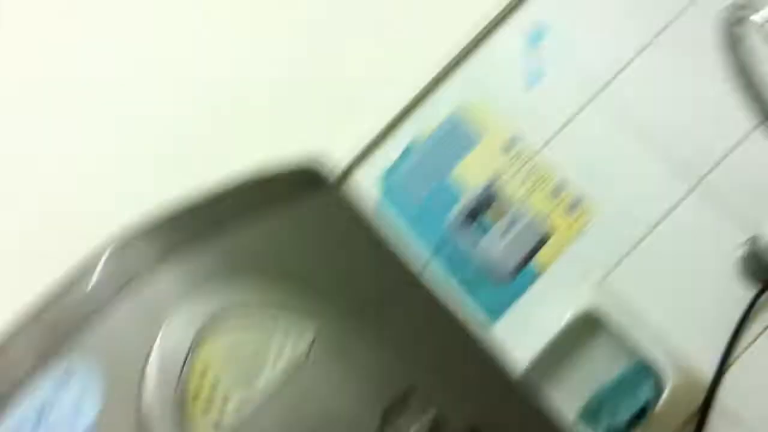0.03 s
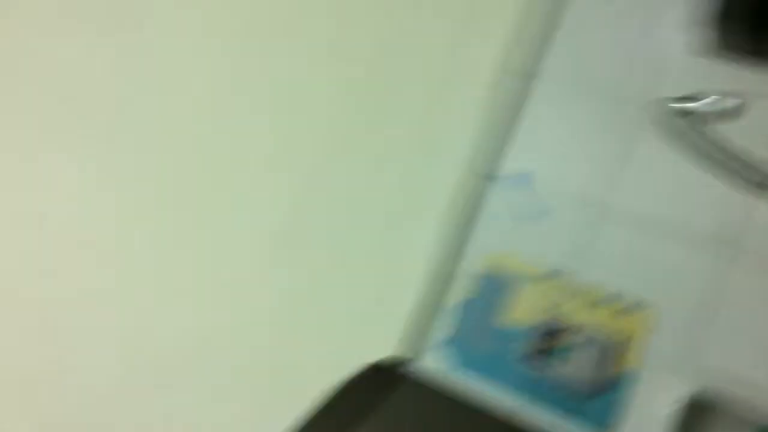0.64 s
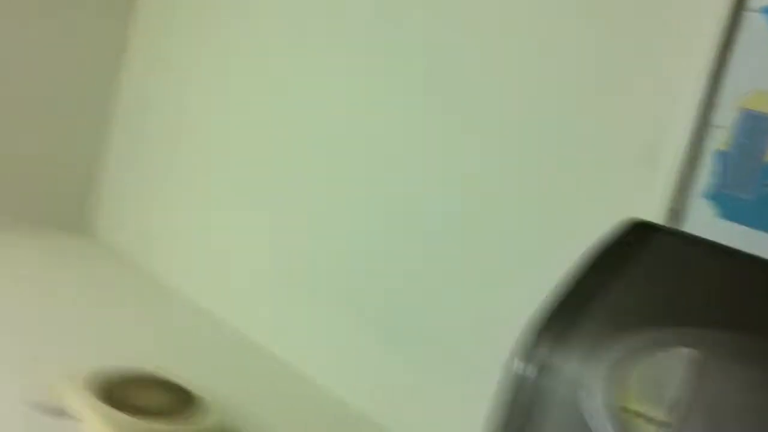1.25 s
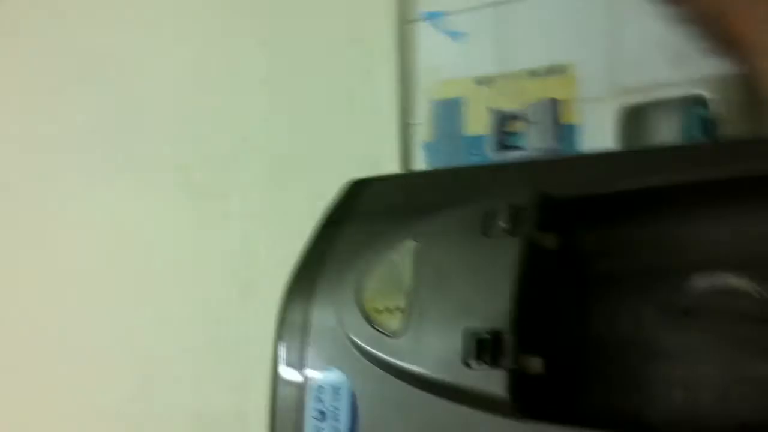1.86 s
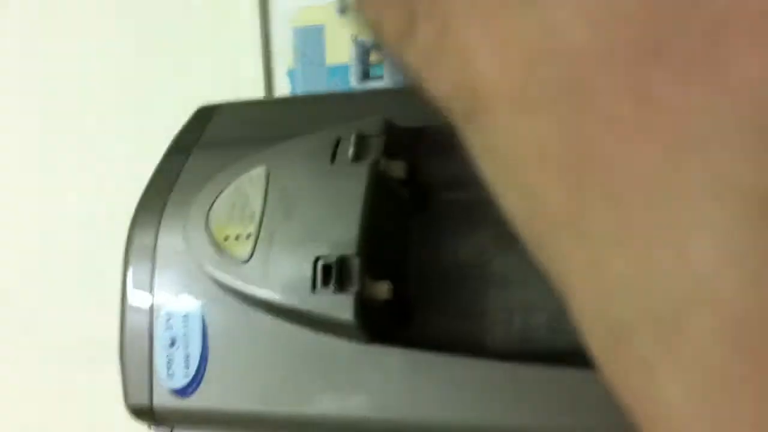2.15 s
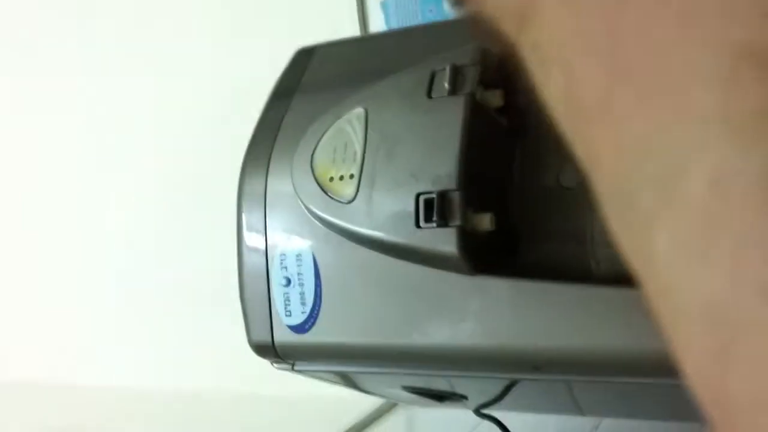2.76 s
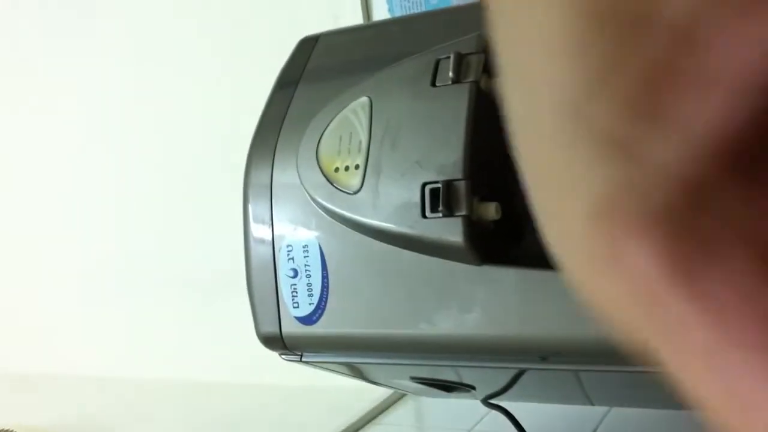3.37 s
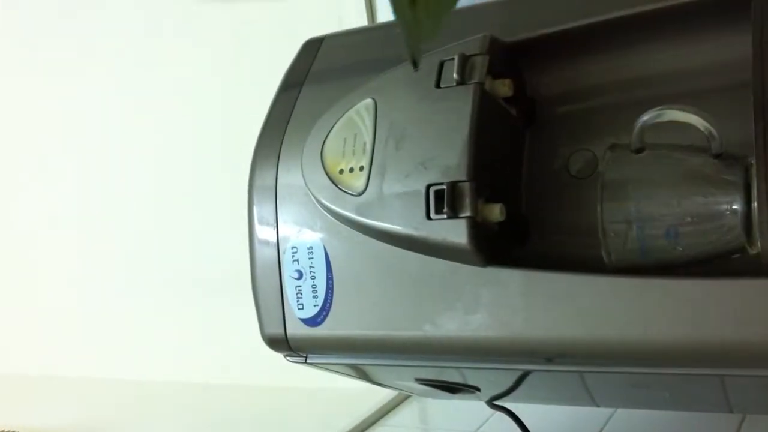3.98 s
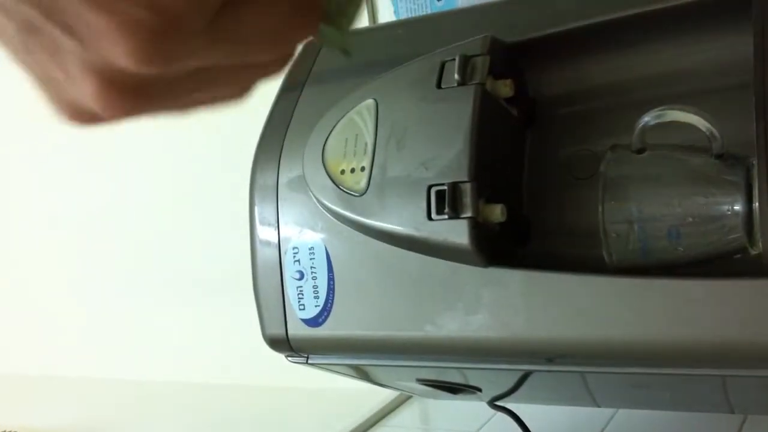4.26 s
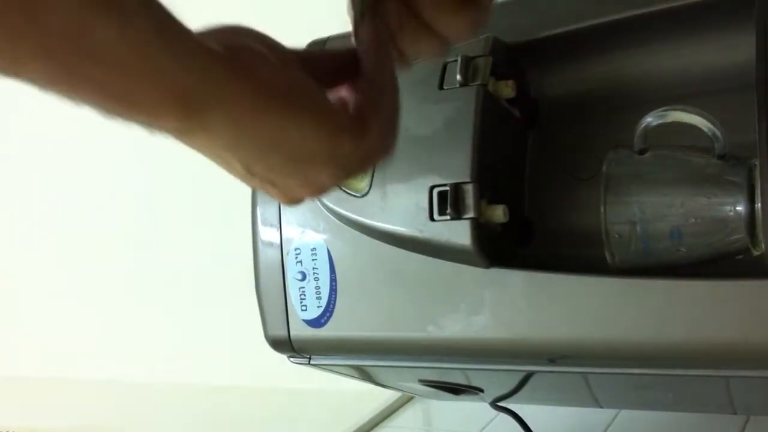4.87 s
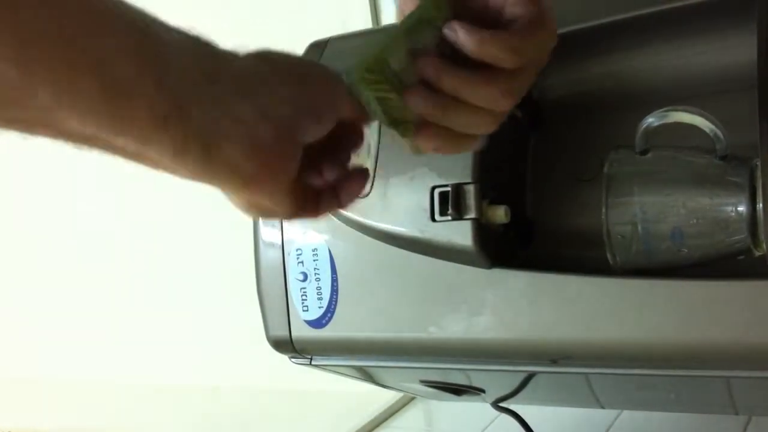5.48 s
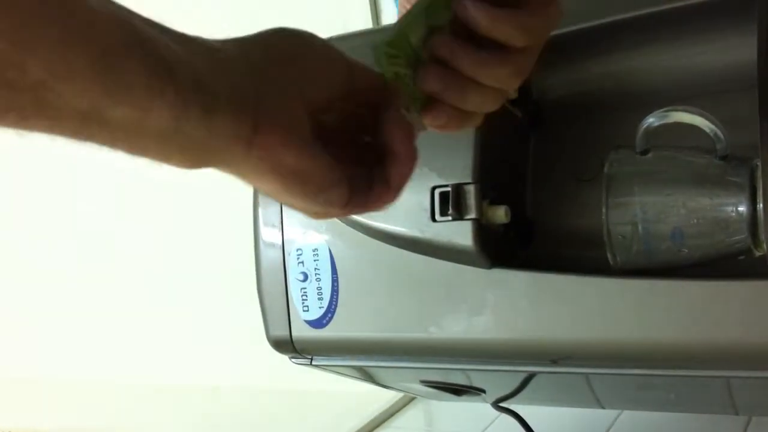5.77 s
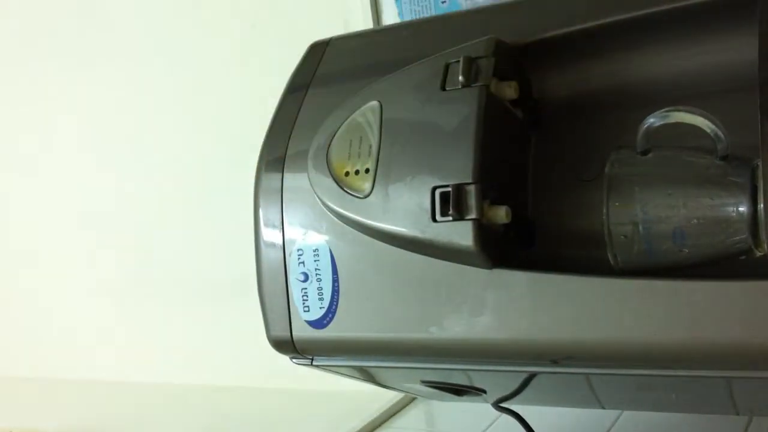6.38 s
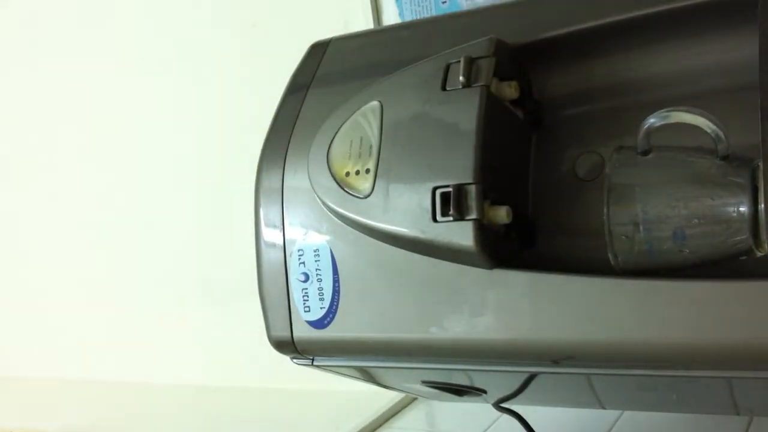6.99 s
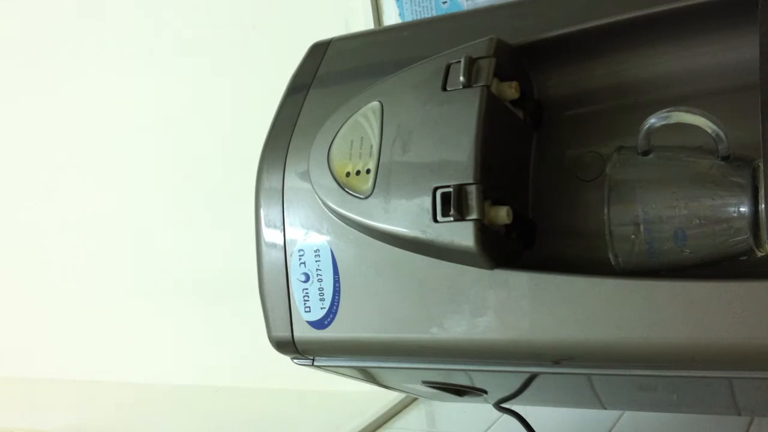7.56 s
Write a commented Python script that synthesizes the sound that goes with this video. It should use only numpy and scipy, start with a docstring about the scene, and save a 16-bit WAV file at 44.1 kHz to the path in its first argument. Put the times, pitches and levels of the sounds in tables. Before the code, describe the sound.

Over a faint kitchen hum, a packet rubs and snaps, a glass mug knocks down twice, and the packet tears in three pulls.

```python
"""Over a faint machine hum in a small tiled kitchen, a packet slides out with a hollow rub, snapping
as it buckles. A glass mug lands on a water dispenser's plastic tray and rocks; tray and glass ring.
Fingers crinkle the packet and rip it in three pulls, fibre by breaking fibre, and a dull bump follows.
An automatic gain control ducks the whole mix after the loudest hits and creeps back."""
import sys
import numpy as np
from scipy import signal
from scipy.fft import rfft, irfft, next_fast_len
from scipy.io import wavfile
from scipy.ndimage import uniform_filter1d

SR = 44100
rng = np.random.default_rng(int(sys.argv[2]) if len(sys.argv) > 2 else 0)


def pcm_store(signal):
    """Save signal as 16-bit PCM."""
    levels = np.round(np.clip(np.atleast_2d(signal), -1, 1) * 32767)
    wavfile.write(sys.argv[1], SR, levels.astype(np.int16).T)


N = 340893

# The bed of hum and hiss. Each row: frequency in Hz, relative level in dB.
HUM_EQ = [(25, -24), (70, -22), (110, -3), (170, 2), (240, -2), (370, -2), (550, -9.5), (750, -11.5),
          (1150, -9.5), (2000, -18), (4500, -18), (7000, -20), (12000, -22.5), (16000, -19.5)]
# The machine's fuzzy whines. Each row: centre in Hz, width in Hz, level in dB.
WHINES = [(181.1, 46, -74.5), (363.9, 18, -71), (484.5, 4.8, -74.5), (3777, 93, -77), (4600, 64, -80),
          (5170, 60, -82.5), (5955, 92, -79.5), (14720, 500, -75.5)]
# The tiled room's reverb. Each row: frequency in Hz, time to fall 60 dB in seconds.
ROOM_DECAY = [(200, 0.87), (600, .42), (1400, 0.44), (3700, .52), (9700, .4), (16000, 0.42)]
# Strokes that slide the packet out. Each row: fastest moment, rise and fall in seconds,
# then relative rub and swish levels in dB.
SLIDE_STROKES = [(.6, 0.09, 0.4, -59.5, -59), (0.859, 0.078, .14, -51, -49), (1.16, .11, 0.15, -57, -63.5),
                 (1.48, 0.16, .03, -52, -54)]
# The hollow surface under the rub. Each row: centre in Hz, width in Hz, boost in dB.
SURFACE_RESONANCES = [(1603, 200, 3), (1957, 150, 3), (2355, 160, 4), (3050, 150, 4.5)]
# The midrange body of the slide. Each row: frequency in Hz, relative level in dB.
RUB_EQ = [(250, -36), (450, -5.5), (700, -8.5), (950, -7.5), (1300, -2.5), (1600, -1.5), (2350, -2.5),
          (2900, -10), (5000, -16.5), (7000, -24)]
# The airy top of the slide. Each row: frequency in Hz, relative level in dB.
SWISH_EQ = [(1500, -23), (2500, -7), (2950, 1), (3600, -3), (6500, -2.5), (10000, -7.5), (16000, -12.5)]
# The packet buckles. Each row: start in seconds, relative level in dB, ring pitch in Hz,
# treble tilt in dB per octave, relative reverb send in dB.
BUCKLES = [(.495, -37.5, 4160, -1, -7), (.518, -15, 1800, 1.5, -7), (.646, -35, 6300, -0.5, -2),
           (1.283, -29.5, 2400, -4, -18), (1.439, -34, 1903, 0, -7), (1.468, -33.5, 1903, 0, -8),
           (1.503, -26.5, 1156, -4, -3.5), (1.5062, -13, 1800, .5, -12.5), (1.983, -14.5, 5830, -2, -13),
           (3.527, -25, 2400, -2.5, -8.5), (3.572, -36.5, 4600, -4, -7), (3.608, -27, 2600, -4, -6),
           (3.6752, -21, 3440, -1, -7.5), (3.941, -33.5, 2180, -3.5, -2), (4.057, -28.5, 7260, -2, -3),
           (4.701, -29, 8680, 2.5, -.5), (4.852, -33, 5540, -2, 0), (5.0624, -33, 10700, 2.5, -19),
           (5.086, -9, 9230, 4, -5), (5.175, -30.5, 6000, 2, -7), (5.389, -38, 3580, -4, -10),
           (5.527, -23.5, 11000, 2.5, 0), (5.608, -24, 9000, 0, -11.5), (5.782, -31, 2220, -1.5, -3),
           (5.8633, -23, 4500, -1, -3), (6.027, -20, 11100, -1, -1), (6.288, -30, 2400, -1, 0),
           (6.396, -28.5, 4420, -3, -1)]
# The basic tone of a snap. Each row: frequency in Hz, relative level in dB.
SNAP_EQ = [(60, -23), (250, -8), (430, -4.5), (800, -1), (2000, -2.5), (6000, 0.5), (11000, -3.5),
           (16000, -8.5)]
# The mug meets the tray. Each row: start in seconds, relative level in dB, first rocking gap in seconds,
# loss per contact in dB, contact cutoff in Hz (lower is softer), tray note in Hz,
# then the ring of the mug's wall and of its base in relative dB.
MUG_KNOCKS = [(1.92, -47, .002, 4.5, 1200, 701, -12, -21), (2.039, -37.5, 0.0046, 15, 686, 385, -21, -25),
              (2.0808, -4, 0.0027, 3.5, 3200, 852, 5.5, 1.5), (2.232, -33, .0019, 4, 805, 667, -11, -22.5),
              (2.293, -44.5, 0.0021, 2, 1200, 950, -5, -21), (2.4173, -28, 0.0034, 1.3, 1200, 553, -20, 22),
              (2.742, -42, .002, 9, 1500, 400, -24, -22.5), (2.7788, -8.5, 0.0029, 2.5, 2795, 927, -12, 22),
              (2.91, -44.5, 0.0031, 7, 400, 230, -18, -21)]
# The clack of glass on plastic. Each row: frequency in Hz, relative level in dB.
CONTACT_EQ = [(40, -41), (120, -22.5), (230, -6.5), (340, -6), (520, -4.5), (900, -1), (1950, -3),
              (2800, -12), (3900, -19), (5000, -6.5), (8000, -13.5), (10000, -17), (15000, -25.5)]
# The plastic tray's ring. Each row: pitch in Hz, relative level in dB, time to fall 60 dB in seconds.
TRAY_MODES = [(238, -23, .08), (385, -31, 0.034), (577, -22, .11), (634, -31, 0.27), (804.4, -23.5, .15),
              (950, -32, 0.24), (1015, -31, 0.23), (1206, -30, .15), (1420, -34, 0.11), (1500, -30, .15),
              (1713, -28.5, .07), (1880, -23, .062)]
# The glass's ring; close pairs beat. Each row: pitch in Hz, relative level in dB,
# time to fall 60 dB in seconds, share of the mode in the base rather than the wall.
GLASS_MODES = [(2620, -40.5, 0.39, 0.062), (2700, -49, 0.27, 0), (2720, -43.5, 0.57, 0.18),
               (2740, -43, 0.31, 0.21), (3276, -32.5, 0.12, 1), (3300, -46, 0.23, 1),
               (4500, -43, .24, 0.25), (5060, -36, 0.068, 0.072), (4970, -30, .07, 0.98),
               (5016, -53, 0.36, 0.86), (5960, -42.5, 0.38, 0), (6404, -40.5, 0.2, 0.1),
               (7160, -51, 0.24, 0.094), (8100, -29.5, .06, 0.14), (9400, -39.5, .07, 0.22),
               (10600, -42.5, 0.099, .2), (14100, -50.5, .06, 0.39)]
# Fingers squeeze the packet. Each row: peak time in seconds, relative level in dB.
SQUEEZES = [(2.0, -67.5), (3.64, -63), (4.1, -68), (4.71, -65.5), (5.41, -59), (5.9, -57.5), (6.41, -64),
            (6.53, -58), (6.69, -62.5)]
# The tone of crinkling and breaking fibres. Each row: frequency in Hz, relative level in dB.
FIBRE_EQ = [(150, -44.5), (250, -11.5), (319, -12), (476, -4), (674, -13), (860, -6.5), (955, -10.5),
            (1220, -2.5), (1350, -6), (2050, -2), (3340, -4.5), (6250, -2), (7700, -4.5), (10900, -0.5),
            (16000, -9.5)]
# Pulls that rip the packet. Each row: start, fastest moment and end in seconds,
# relative level in dB, surge boost in dB.
RIP_PULLS = [(5.088, 5.207, 5.23, -54.5, 14), (5.525, 5.58, 5.618, -44.5, 7),
             (5.928, 6.042, 6.08, -42, 5.5)]
# The dull body of the bump. Each row: frequency in Hz, relative level in dB.
BUMP_EQ = [(30, -43), (70, -28), (170, -1), (380, -1), (600, -13), (900, -2), (1150, -12), (1500, -7),
           (2000, -16), (3500, -25.5), (5500, -22.5), (9000, -30.5), (16000, -39.5)]


def amp(db):
    """Decibels to gain."""
    return np.exp(np.asarray(db) * np.log(10) / 20)


def unit(x):
    """Scale to rms 1."""
    return x / np.sqrt(np.mean(x ** 2) + 1e-20)


def along(points, hz):
    """Read a curve of (Hz, value) points on a log frequency axis."""
    point_hz, values = np.transpose(points)
    return np.interp(np.log(hz + 1), np.log(point_hz + 1), values)


def bell(hz, centre, width):
    """A resonant peak of height 1, width Hz across at half height."""
    return 1 / (1 + (2 * (hz - centre) / width) ** 2)


def filtered(x, gain):
    """Apply a gain that depends on frequency."""
    size = next_fast_len(N + SR // 2)
    return irfft(rfft(x, size) * gain(np.fft.rfftfreq(size, 1 / SR)), size)[:N]


def coloured(x, eq):
    """Shape x with an EQ of (Hz, dB) points, at rms 1."""
    return unit(filtered(x, lambda hz: amp(along(eq, hz))))


def pulse(shape_db, size=2048):
    """A minimum-phase click with the given spectrum, peak 1."""
    cepstrum = irfft(np.log(amp(shape_db(np.fft.rfftfreq(size, 1 / SR))) + 1e-6))
    cepstrum[1:size // 2] *= 2
    cepstrum[size // 2 + 1:] = 0
    click = irfft(np.exp(rfft(cepstrum)))
    return click / np.abs(click).max()


def fade(t, t60):
    """Free decay, 60 dB down after t60 seconds."""
    return np.exp(-np.log(1000) * t / t60)


def swell(start, end, rise, fall):
    """An envelope: a smooth rise up to start, a hold until end, a smooth fall."""
    t = np.arange(N) / SR
    return np.exp(-(np.minimum(t - start, 0) / rise) ** 2 - (np.maximum(t - end, 0) / fall) ** 2)


def wobble(rate):
    """A random curve, rate knots a second."""
    knots = rng.standard_normal(int(N * rate / SR) + 2)
    return np.interp(np.arange(N) * rate / SR, np.arange(len(knots)), knots)


def add(track, start, sound):
    """Mix a sound in at start seconds."""
    i = round(start * SR)
    track[i:i + len(sound)] += sound[:N - i]


def scatter(t60, db):
    """An impulse with a short diffuse tail, whose energy is db relative to it."""
    t = np.arange(SR // 20) / SR
    tail = rng.standard_normal(len(t)) * fade(t, t60)
    return (t == 0) + amp(db) * tail / np.linalg.norm(tail)


def grains(rate, spread_db):
    """Tiny fractures at random moments, rate a second; a wide spread makes a few stand out."""
    when, chance, side = rng.random((int(rate * N / SR), 3)).T
    size = amp(-spread_db * np.log(chance + .02)) * np.sign(side - .5)
    return unit(np.bincount((when * N).astype(int), size, N))


def slipping(rate, spread_db, slip_rate, slip_db, patch_db):
    """Grains that clump as the material catches and slips; each clump favours other bands."""
    out = np.zeros(N)
    for edges_hz in [(100, 3000), (3000, 7500), (7500, 18000)]:
        bandpass = signal.butter(2, edges_hz, "band", fs=SR, output="sos")
        band = signal.sosfilt(bandpass, grains(rate, spread_db))
        out += band * amp(patch_db * wobble(slip_rate))
    return out * amp(slip_db * wobble(slip_rate))


def machine_hum():
    """A steady bed of hum and hiss, with narrow bands of noise for the whines."""
    power = lambda hz: sum((amp(db) * unit(bell(hz, centre, width))) ** 2 for centre, width, db in WHINES)
    whines = filtered(rng.standard_normal(N), lambda hz: np.sqrt(power(hz)))
    return amp(-62) * coloured(rng.standard_normal(N), HUM_EQ) + whines


def room(x, build_s=0.0035):
    """The tiles answer, each frequency dying at its own speed."""
    hz, t, noise = signal.stft(rng.standard_normal(SR * 3 // 4), SR, nperseg=256)
    tail = signal.istft(noise * fade(t, along(ROOM_DECAY, hz)[:, None]), SR, nperseg=256)[1]
    tail *= 1 - np.exp(-np.arange(len(tail)) / SR / build_s)
    return signal.fftconvolve(x, tail / np.linalg.norm(tail))[:N]


def packet_slide():
    """Fine friction over a hollow surface: a rub, with a swish on the fast strokes."""
    rub_power, swish_power = np.zeros((2, N))
    for fastest, rise, fall, rub_db, swish_db in SLIDE_STROKES:
        stroke = swell(fastest, fastest, rise, fall)
        rub_power += (amp(rub_db) * stroke) ** 2
        swish_power += (amp(swish_db) * stroke) ** 2
    hollow = lambda hz: amp(sum(db * bell(hz, centre, width) for centre, width, db in SURFACE_RESONANCES))
    friction = slipping(rate=6000, spread_db=0.5, slip_rate=110, slip_db=1.5, patch_db=1.5)
    rub = np.sqrt(rub_power) * coloured(filtered(friction, hollow), RUB_EQ)
    swish = np.sqrt(swish_power) * coloured(grains(rate=9900, spread_db=3), SWISH_EQ)
    return amp(-1) * (rub + swish) + amp(-8) * room(rub + swish)


def packet_snaps(ring_db=6.5, ring_octaves=0.55, bass_hz=1100, room_ring=0.22):
    """Each buckle is one sharp click, coloured by the patch of wrapper that flips."""
    direct, send = np.zeros((2, N))
    for start, db, ring_hz, tilt_db, send_db in BUCKLES:
        bass_db = 5.5 + .45 * db  # bigger snaps carry more weight
        octaves = lambda hz: np.log2((hz + 100) / ring_hz)
        body = lambda hz: along(SNAP_EQ, hz) + tilt_db * octaves(hz) + bass_db / (1 + (hz / bass_hz) ** 4)
        ring = lambda hz: ring_db * np.exp(-(octaves(hz) / ring_octaves) ** 2)
        near = signal.fftconvolve(pulse(lambda hz: body(hz) + ring(hz)), scatter(t60=0.014, db=2))
        # the room hears every side of the packet, so its answer is less coloured
        far = pulse(lambda hz: body(hz) + room_ring * ring(hz))
        add(direct, start, amp(db + 8) * near / np.linalg.norm(near))
        add(send, start, amp(db + 7.5 + send_db) * far / np.linalg.norm(far))
    return direct + room(send)


def ringing(hz, t60, attack_s=0.0046):
    """The modes of a struck body: one dying sine per row, with a softened attack."""
    t = np.arange(SR // 2) / SR
    return np.sin(2 * np.pi * hz[:, None] * t) * fade(t, t60[:, None]) * (1 - np.exp(-t / attack_s))


def mug_on_tray(contacts=8, quicken=.35, note_db=9, note_octaves=0.18, hollow=0.95):
    """The mug rocks through a quickening run of contacts; tray and glass ring on."""
    out = np.zeros(N)
    tray_hz, tray_db, tray_t60 = np.transpose(TRAY_MODES)
    glass_hz, glass_db, glass_t60, base_share = np.transpose(GLASS_MODES)
    tray, glass = ringing(tray_hz, tray_t60), ringing(glass_hz, glass_t60)
    for start, db, first_gap, loss_db, cutoff_hz, note_hz, wall_db, base_db in MUG_KNOCKS:
        soft_db = lambda hz: -10 * np.log10(1 + (hz / cutoff_hz) ** 4)
        # the spot where it lands gives the tray one hollow note
        spot_db = lambda hz: note_db * np.exp(-(np.log2((hz + 1) / note_hz) / note_octaves) ** 2)
        contact = pulse(lambda hz: along(CONTACT_EQ, hz) + soft_db(hz) + hollow * spot_db(hz))
        gaps = first_gap * np.arange(1, contacts + 1) ** -quicken
        gaps *= 1 + 0.027 * rng.standard_normal(contacts)
        for k, delay in enumerate(np.cumsum(gaps) - gaps):
            clack = signal.fftconvolve(contact, scatter(t60=0.032, db=-7.5))
            add(out, start + delay, amp(db - loss_db * k) * clack)
        push_db = 3 * np.log2(2400 / cutoff_hz)  # softer contacts put more into the tray's ring
        tray_drive_db = push_db + soft_db(tray_hz) + spot_db(tray_hz)
        glass_drive_db = .5 * soft_db(glass_hz) + base_share * base_db + (1 - base_share) * wall_db
        add(out, start, amp(db + tray_db + tray_drive_db) @ tray)
        add(out, start, amp(db + glass_db + glass_drive_db) @ glass)
    return out + amp(-15.5) * room(out)


def packet_crinkle():
    """Sparse little fractures swell under the fingers with each squeeze."""
    squeeze = sum(amp(db) * swell(peak, peak, rise=0.052, fall=.055) for peak, db in SQUEEZES)
    creases = slipping(rate=1100, spread_db=4, slip_rate=100, slip_db=3, patch_db=5.5)
    return squeeze * coloured(creases, FIBRE_EQ)


def packet_rip(surge_share=.18, crackle_db=-4.5):
    """Fibres break in a dense stream as each pull catches, runs, surges and stops."""
    pulls = np.zeros(N)
    for start, fastest, end, db, surge_db in RIP_PULLS:
        surge_s = surge_share * (end - start)
        surge = swell(fastest, fastest, surge_s, surge_s)
        pulls += amp(db + surge_db * surge) * swell(start, end, rise=0.0048, fall=.014)
    fibres = coloured(slipping(rate=6100, spread_db=-1, slip_rate=230, slip_db=3, patch_db=2), FIBRE_EQ)
    crackle = coloured(grains(rate=160, spread_db=3), FIBRE_EQ)  # tough fibres snap singly
    return pulls * (fibres + amp(crackle_db) * crackle)


def bump(start_s=7.652, db=-39, t60=0.43):
    """Something is nudged: a dull rattle that starts at once and dies away."""
    t = np.arange(N) / SR - start_s
    rattle = coloured(grains(rate=1500, spread_db=3), BUMP_EQ)
    return amp(db) * (t > 0) * fade(np.abs(t), t60) * rattle


def scene():
    """The mono mix; crinkle and rip share one reverb send."""
    mix = machine_hum() + packet_slide() + packet_snaps() + mug_on_tray()
    wrapper = packet_crinkle() + packet_rip()
    return (mix + amp(-1.5) * wrapper + amp(-5) * room(wrapper) + bump())[None]


def record(dry, threshold_db=-31, squeeze=0.35, release_db_per_s=3, lag_s=0.054, top_hz=16000):
    """Gain control ducks after loud hits and creeps back; nothing passes the band limit."""
    mix = dry[0]
    level_db = 10 * np.log10(np.abs(uniform_filter1d(mix ** 2, size=441)) + 1e-12)  # 10 ms window
    wanted_db = squeeze * np.maximum(level_db - threshold_db, 0)
    release_db = release_db_per_s * np.arange(N) / SR
    held_db = np.maximum.accumulate(wanted_db + release_db) - release_db
    step = 1 / (lag_s * SR)
    duck_db = signal.lfilter([step], [1, step - 1], held_db)
    return filtered(mix * amp(-duck_db), lambda hz: hz < top_hz)[None]


dry = scene()
out = record(dry)
pcm_store(out)
```